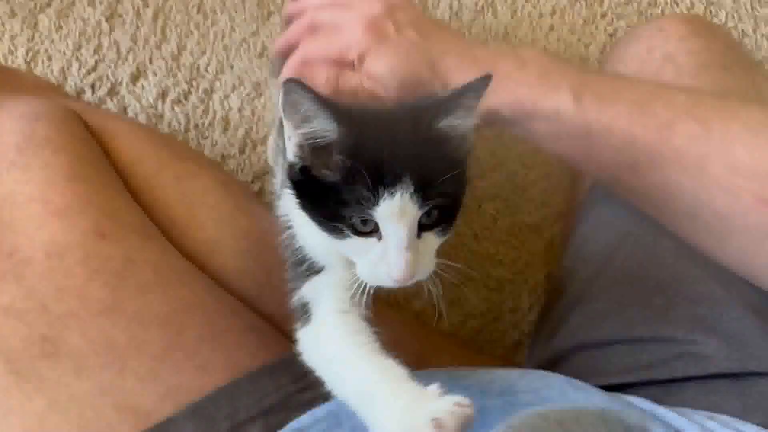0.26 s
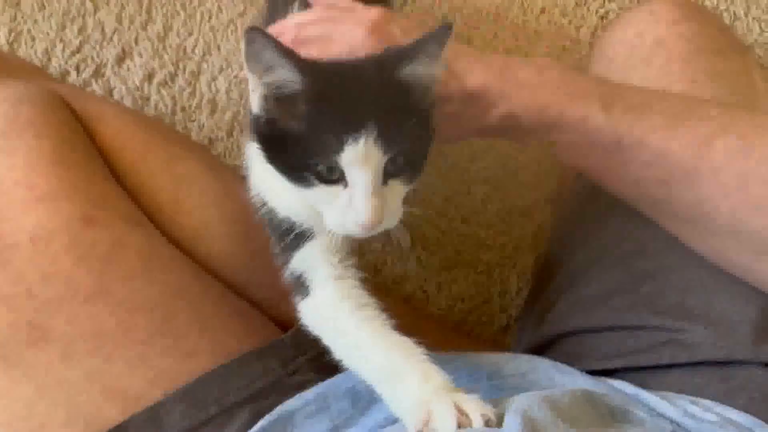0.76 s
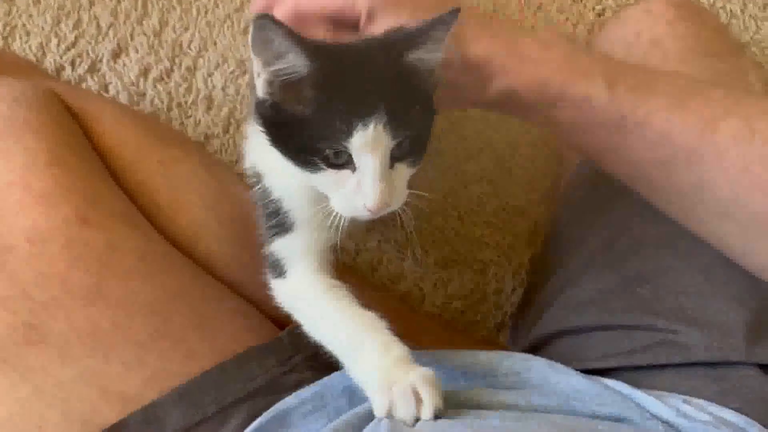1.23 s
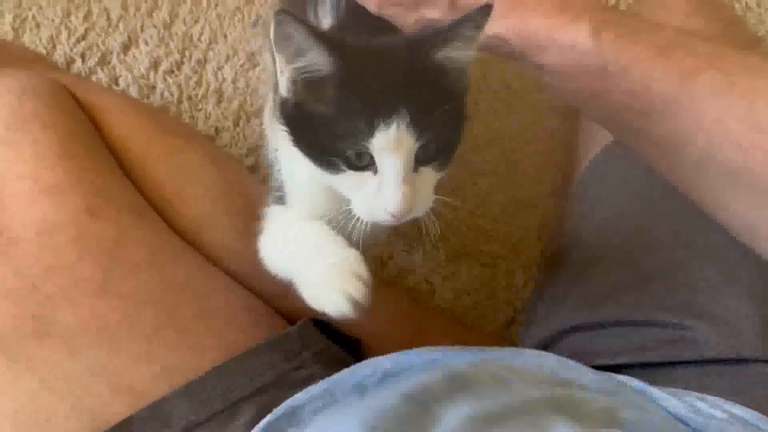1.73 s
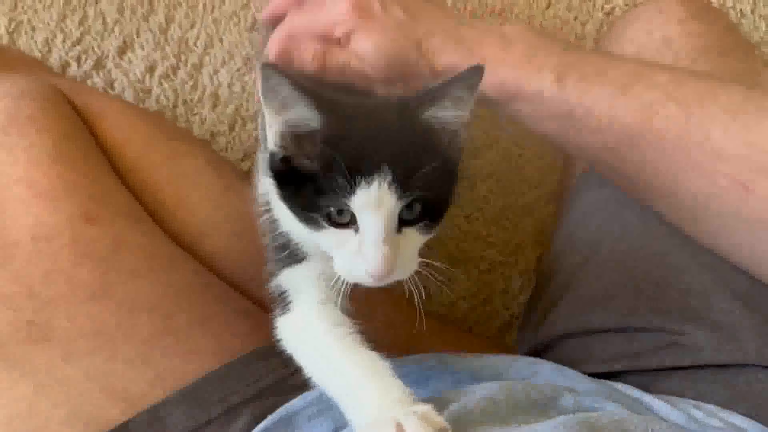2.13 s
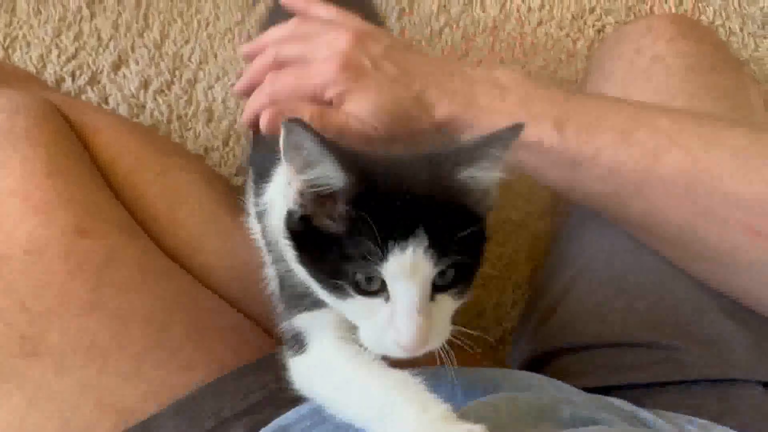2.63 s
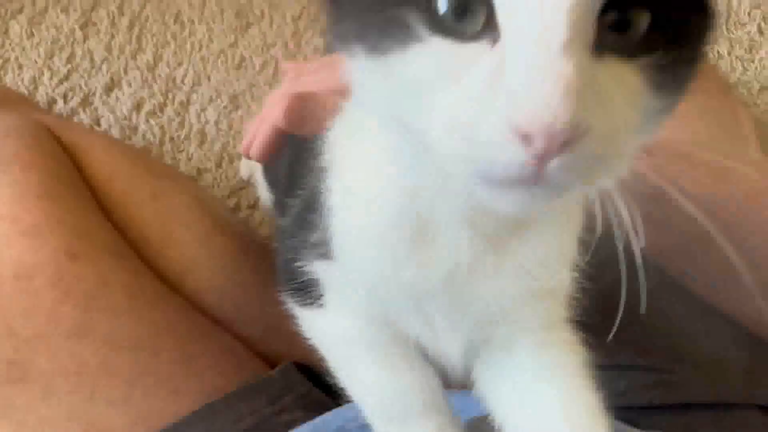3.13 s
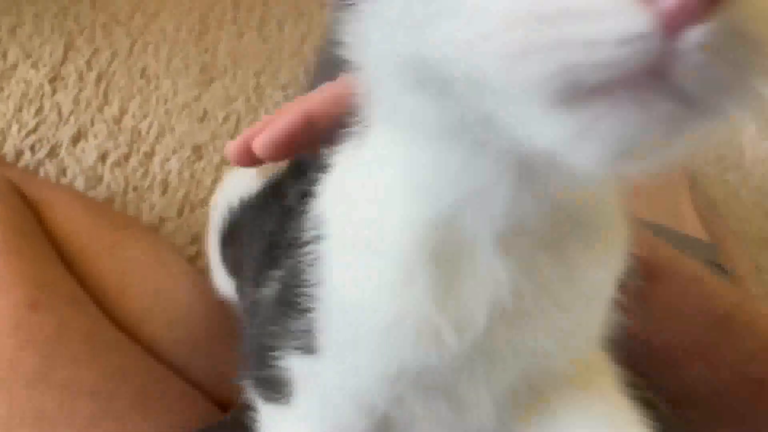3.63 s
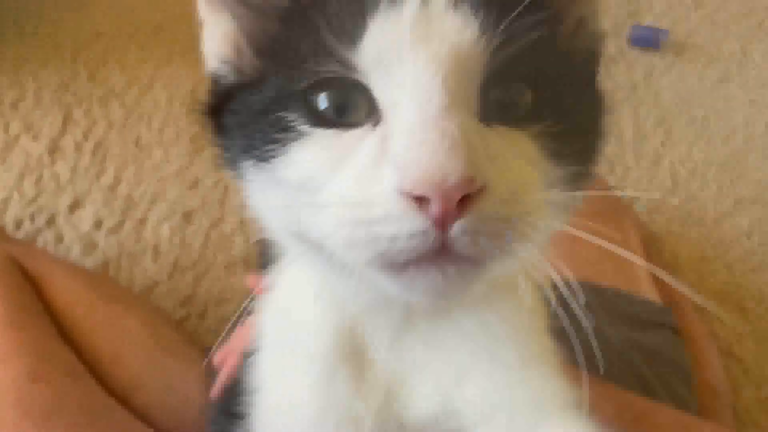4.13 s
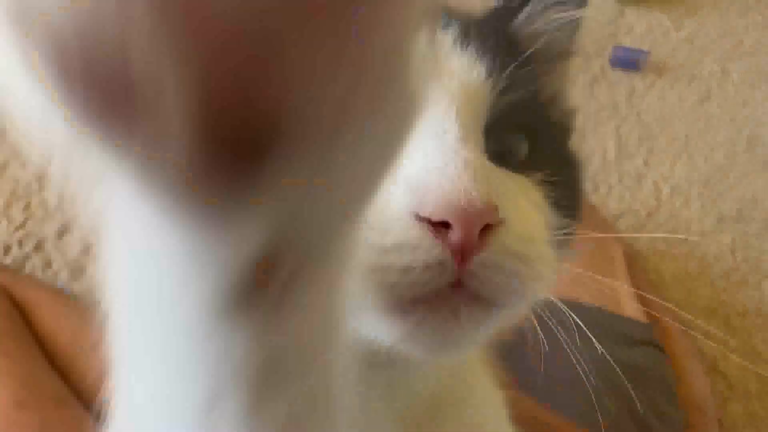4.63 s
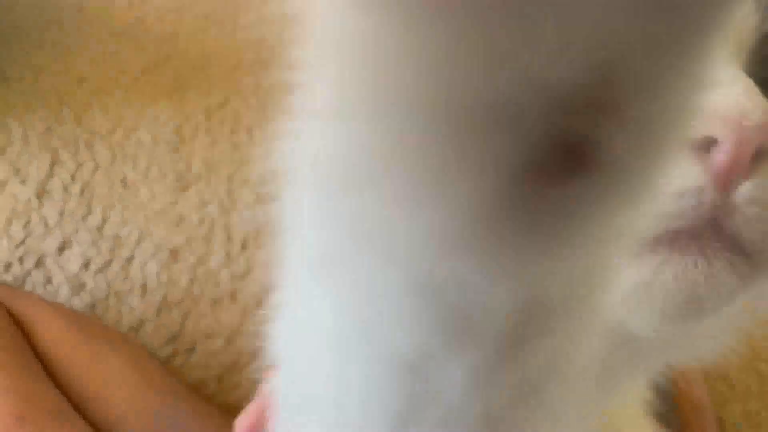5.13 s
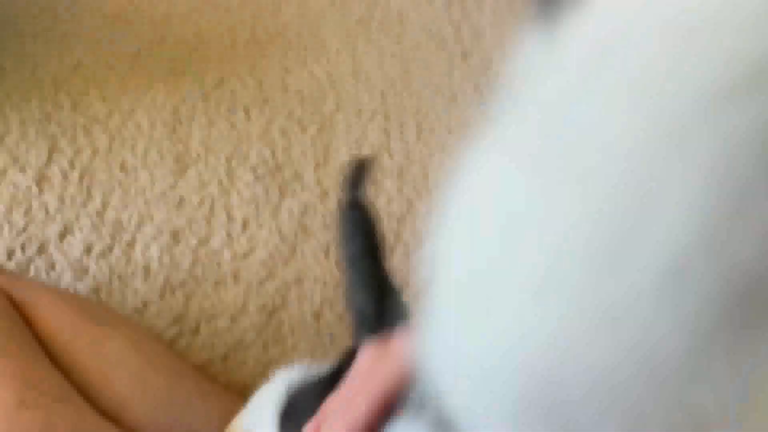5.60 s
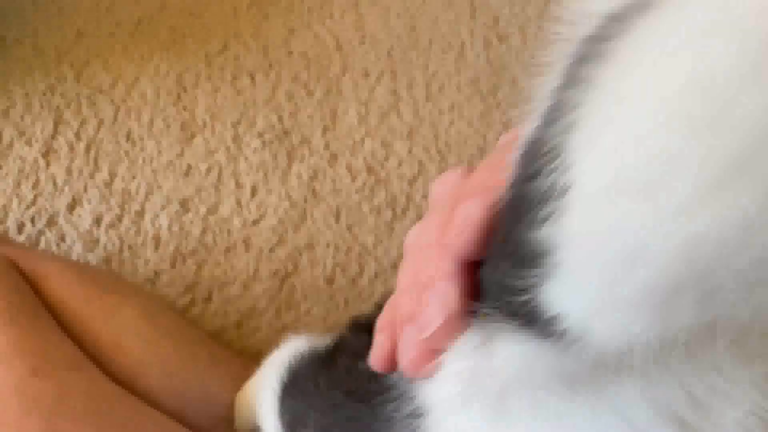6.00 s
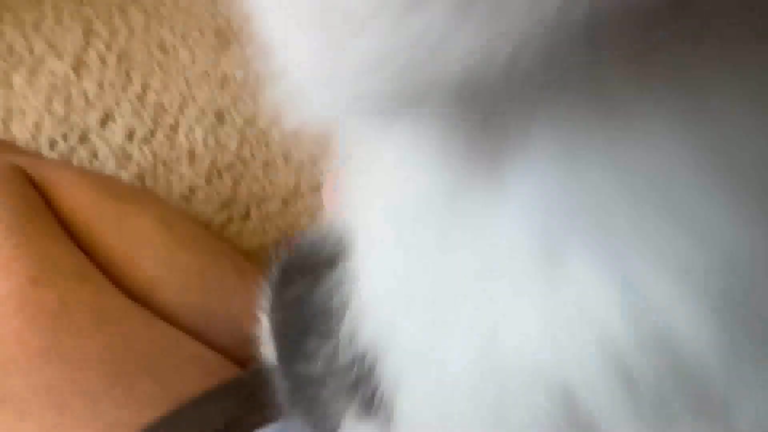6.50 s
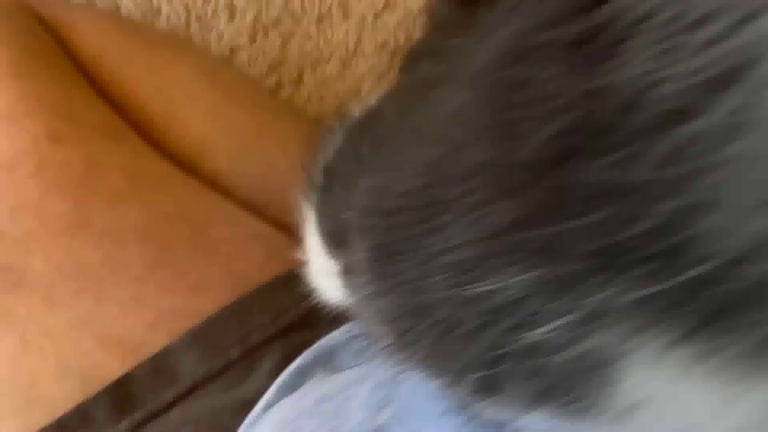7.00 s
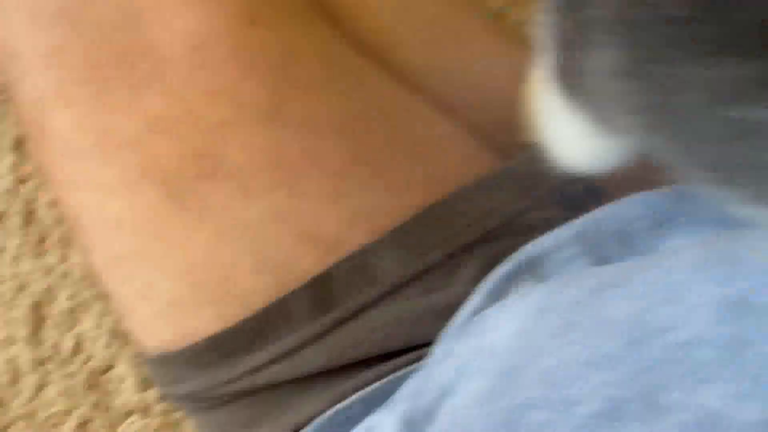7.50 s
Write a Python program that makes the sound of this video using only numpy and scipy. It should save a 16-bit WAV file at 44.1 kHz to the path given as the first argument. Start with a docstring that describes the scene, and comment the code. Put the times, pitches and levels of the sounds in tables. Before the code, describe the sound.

Close, dry indoor sound of a purring kitten being stroked. The purr alternates between outward and inward breaths, with paired soft puffs, barely covered by faint palm-on-fur hiss. It swells as the animal climbs up, then its face strikes the handheld microphone with heavy thuds, clicks and one bright snap. Afterwards fur brushes past in rustling sweeps with light knocks and ticks, while the purr carries on and drifts to the right.

```python
"""A fluttering purr is heard first, over room hush and low handling rumble: a kitten lies on a lap.
A hand strokes its back with soft hisses; it climbs up to the microphone, bumps it and rubs its fur along it.
Each purr beat is two puffs from the larynx, sounding through body, throat and nose; touches are damped
rings, and rubbing is grainy noise. The microphone lags in the bass, so puffs and bumps sweep downward."""
import sys
import numpy as np
from scipy import signal
from scipy.fft import rfft, irfft, next_fast_len
from scipy.io import wavfile

SR = 44100
rng = np.random.default_rng(int(sys.argv[2]) if len(sys.argv) > 2 else 0)


def unload_audio(sound):
    """Save the sound as a 16-bit wav file, at the path given as the first command line argument."""
    columns = np.transpose(np.atleast_2d(sound))
    # keep every value between -1 and 1, then stretch to whole-number steps
    steps = np.round(np.clip(columns, -1, 1) * 32767)
    wavfile.write(sys.argv[1], SR, steps.astype(np.int16))


N = 341775
TIME = np.arange(N) / SR
SIZE = next_fast_len(N + SR // 2)   # padded transform length
FREQS = np.maximum(np.arange(SIZE // 2 + 1) * SR / SIZE, 1)

# Spectrum of the quiet room. Each row: frequency in Hz, relative level in dB.
ROOM_SPECTRUM = [(20, -26), (45, -8), (70, 1), (220, -3), (400, -22.5), (800, -35.5), (1700, -27),
                 (3000, -32.5), (5500, -37.5), (7000, -36.5), (8700, -46.5), (15000, -39)]
ROOM_DB, ECHO_DB, ROOM_T60_S = -66.5, -14.5, .2
# Likeness of left and right noise. Each row: frequency in Hz, correlation from 0 to 1.
LIKENESS = [(60, 0.92), (300, 0.95), (700, 1), (1500, 0), (15000, 0.15)]

# The microphone shifts in the hand. Each row: start in seconds, end in seconds, level in dB.
JOSTLES = [(0, 4.7, -60), (1.53, 2.05, -60.5), (4.75, 5.35, -54.5), (5.5, 5.6, -61), (6.19, 6.42, -46.5),
           (6.499, 8.2, -61)]
JOSTLE_ATTACK_S, JOSTLE_RELEASE_S = 0.037, 0.016
# Spectrum of handling rumble. Each row: frequency in Hz, relative level in dB.
RUMBLE_SPECTRUM = [(20, -20), (45, -3), (80, 0.5), (160, -10), (300, -18), (700, -38.5), (2000, -62.5)]

# The hand slides down the back. Each row: middle in seconds, half length in seconds, level in dB.
STROKES = [(0.27, .13, -77.5), (0.928, 0.085, -76), (1.51, 0.1, -78), (2.147, 0.12, -76.5),
           (2.722, 0.096, -75.5)]
# Spectrum of a palm on fur. Each row: frequency in Hz, relative density in dB per Hz.
STROKE_SPECTRUM = [(300, -4), (1500, 4.5), (9000, -1), (15000, -1.5)]

# Fur slides along the microphone. Each row: start in seconds, end in seconds, level at the start in dB.
RUBS = [(4.77, 5.081, -66.5), (5.546, 5.716, -61.5), (6.575, 7.75, -61)]
RUB_ATTACK_S, RUB_RELEASE_S, RUB_SLOPE_DB_PER_S = 0.033, 0.062, -6
# Spectrum of rubbing fur. Each row: frequency in Hz, relative density in dB per Hz.
RUB_SPECTRUM = [(500, 0), (1000, 8.5), (1800, 5.5), (2600, 1.5), (3500, 4), (5500, 1.5), (9500, -4),
                (14000, -4)]
# Quick scuffs of paw and muzzle. Each row: middle in seconds, half length in seconds, level in dB,
# left over right in dB.
SCUFFS = [(1.729, 0.014, -78, 8), (4.308, 0.11, -74, 5.5), (4.761, 0.0019, -24, 1.5),
          (4.78, 0.017, -34.5, 2), (4.963, 0.014, -53.5, 5), (5.262, 0.026, -50.5, -2.5),
          (5.308, 0.014, -36.5, 5), (5.587, 0.011, -53.5, 1), (5.64, 0.0053, -45.5, -2),
          (5.959, 0.049, -60, -4), (6.2, 0.0301, -55.5, -3.5), (6.358, 0.043, -54.5, -1),
          (7.599, 0.025, -57, -5.5)]
# Spectrum of a scuff. Each row: frequency in Hz, relative density in dB per Hz.
SCUFF_SPECTRUM = [(150, 9.5), (650, 15.5), (1150, 6), (2000, 7.5), (2800, 1), (5000, 1.5), (15000, -4.5)]

# Paws and nose bump the microphone. Each row: start in seconds, peak in dB before the contact filter,
# pitch of the damped swing in Hz.
BUMPS = [(1.514, -46, 63.6), (1.802, -37.5, 78), (1.878, -36, 66), (1.995, -37, 73), (2.648, -40, 84),
         (4.73, -11.5, 97), (4.7611, 4, 129), (4.782, -4.5, 285), (4.793, -9, 157), (4.964, -9.5, 68.5),
         (5.236, -18, 218), (5.248, -20, 81), (5.288, -21.5, 117), (5.309, -16.5, 353), (6.315, -34, 171),
         (6.335, -23.5, 405), (6.395, -31.5, 109.6), (6.554, -38.5, 480), (6.577, -34, 100),
         (6.85, -34, 605), (7.597, -25.5, 605), (7.664, -34.5, 800), (7.744, -33.5, 908)]
# Claws and whiskers tick on the housing. Each row: start in seconds, peak in dB, left over right in dB,
# ring in Hz.
TICKS = [(4.7308, -49.5, 16.5, 4000), (4.7642, -24.5, 12, 3830), (5.237, -34.5, 6.5, 3460),
         (5.2863, -29, 9, 5280), (5.5256, -39.5, -1.5, 4900), (5.6484, -29, -8.5, 5850),
         (5.8891, -32, -8.5, 6100), (6.1695, -35, 4.5, 5020), (6.3367, -32.5, 9, 2580),
         (6.5553, -47, -5, 1940), (6.8511, -39, 15.5, 1980), (7.5975, -32.5, 10.5, 3980),
         (7.6153, -44.5, 13, 4070), (7.6672, -39.5, 12.5, 5100), (7.685, -40.5, 7, 3970)]
# One sharp snap: start in seconds, rise time in seconds, rings as (Hz, peak in dB).
SNAP_S, SNAP_RISE_S, SNAP_RINGS = 5.2486, .00013, [(9000, -8), (14300, -15.5)]

# Breaths of the purr, out and in by turns, starting outward. Each row: first beat in seconds,
# last beat in seconds, number of beats, effort in dB.
BREATHS = [(.008, .048, 2, 2), (.088, .653, 16, 1.5), (.692, 1.536, 22, -2), (1.574, 2.226, 18, -1.5),
           (2.265, 3.1435, 23, 1.5), (3.182, 3.704, 15, -0.5), (3.7465, 4.187, 12, 2.5),
           (4.226, 4.613, 11, -0.5), (4.653, 5.105, 12, 3.5), (5.146, 5.337, 6, 0), (5.378, 5.664, 8, 0.5),
           (5.705, 6.057, 10, -7.5), (6.098, 6.425, 9, 3), (6.464, 6.665, 6, 0), (6.706, 7.129, 11, 0.5),
           (7.170, 7.448, 8, 1.5), (7.490, 7.745, 7, -1.5)]
# Shape of a breath, as (out, in): gap between the two puffs, edge levels, and slope through the breath.
PUFF_GAP_S = (.0158, .0125)
ONSET_DB, SLOPE_DB_PER_S, END_DB = (-3, -6.5), (3.5, -1.5), (-4.5, -6)
ATTACK_S, RELEASE_S = 0.026, .03
# Second puff against the first in dB, as (out, in).
SECOND_HUM_DB, SECOND_CHEST_DB = (-5.5, -10.5), (-9.5, 1)
SECOND_THROAT_DB, SECOND_NOSE_DB = (-0.5, 3), (5.5, 18)
# Turbulence relative to each pulse.
HUM_ROUGH, CHEST_ROUGH, THROAT_ROUGH, NOSE_ROUGH = .15, .27, .15, .5
# Climb up to the microphone and past it. Each row: time in seconds, gain from nearness in dB.
NEARNESS = [(0, -1.5), (.8, -0.5), (1.1, 3), (1.6, -0.5), (2.6, -1.5), (3.3, 3.5), (3.76, 12.5), (3.95, 4),
            (4.9, 8.5), (5.6, 8), (6.3, 4.5), (7.75, 1.5)]
# Turn of the head. Each row: time in seconds, facing the microphone from 0 to 1, left over right in dB.
HEAD_POSE = [(0, 0, 0.5), (2.6, 0.5, 3), (2.78, 1, 0), (3.5, 0.86, 3.5), (5.1, .95, 4), (5.7, 0.8, 0.5),
             (6.35, .95, 2), (6.5, .3, 7.5), (7.2, 0.6, -10.5), (7.75, 1, -19.5)]
# The body drops out of the microphone's reach. Each row: middle in seconds, half length in seconds,
# change in dB.
BODY_HIDDEN = [(5.684, 0.43, -12), (7.75, 0.11, -21.5)]
# Spectrum of the deep body hum. Each row: frequency in Hz, relative level in dB.
HUM_SPECTRUM = [(25, -31.5), (50, 6.5), (82, 20), (120, 7), (180, -13.5), (300, -68.5)]
# Spectrum of the chest. Each row: frequency in Hz, relative level in dB.
CHEST_SPECTRUM = [(60, -28.5), (130, -1), (185, 2), (238, 4.5), (300, -1), (400, -13.5), (600, -64.5)]
# Spectrum of the throat, head turned away. Each row: frequency in Hz, relative level in dB.
THROAT_AVERTED_SPECTRUM = [(250, -11.5), (380, -11), (480, 3), (560, 5), (680, -0.5), (820, -18.5),
                           (1100, -26.5), (1600, -69.5)]
# Spectrum of the throat, facing the microphone. Each row: frequency in Hz, relative level in dB.
THROAT_FACING_SPECTRUM = [(250, -6), (400, -.5), (620, 1), (780, 0.5), (890, -6.5), (1020, -31.5),
                          (1600, -64.5)]
# Spectrum of the nose. Each row: frequency in Hz, relative level in dB.
NOSE_SPECTRUM = [(750, -23), (1100, -3), (1450, -1), (1850, -4.5), (2250, -22.5), (2900, -47)]
# Spectrum of air rasping in the nostrils. Each row: frequency in Hz, relative level in dB.
RASP_SPECTRUM = [(2000, -11.5), (3200, -12), (4800, -1.5), (6500, -18)]
# Levels with the head turned away, before nearness, and what facing the microphone adds.
HUM_DB, CHEST_DB, THROAT_DB, NOSE_DB = -64.5, -58.5, -74.5, -86.5
THROAT_FACING_DB, NOSE_FACING_DB = 11, 4
# Shares of the nearness gain and of the left-right level, relative to the throat.
HUM_FOLLOWS, CHEST_FOLLOWS, NOSE_FOLLOWS = 1, 0.86, 1.05
BODY_PAN_SHARE, NOSE_PAN_SHARE = 0.27, 2.1
# The flank presses close: the chest booms and the deep hum is damped.
FLANK_START_S, FLANK_END_S, FLANK_FADE_S, FLANK_CHEST_DB, FLANK_HUM_DB = 7.16, 7.46, 0.22, 9.5, -6.5

# Resonance of the microphone port and the notch above it. Each row: frequency in Hz, gain in dB.
PORT_RESPONSE = [(6000, -0.5), (7500, 3), (8700, 7.5), (10100, 0.5), (11000, -19), (11500, -18.5),
                 (12300, -4.5), (14800, -2.5)]
# Phase lead of the left port over the right. Each row: frequency in Hz, phase in radians.
PORT_PHASE = [(250, 0.2), (600, 0.53), (1500, 0.28), (9000, 0.97)]
# Sensitivity of the left port over the right. Each row: frequency in Hz, level in dB.
PORT_BALANCE = [(60, 0.9), (650, 0), (1000, 4), (7300, 3.5), (9000, 0.5)]
CUTOFF_HZ = 16300


def from_db(db):
    """A level in decibels is twenty times the logarithm of an amplitude ratio."""
    return 10 ** (np.asarray(db) / 20)


def rms_one(x):
    """Dividing by the root mean square gives unit power."""
    return x / np.sqrt(np.mean(x ** 2) + 1e-30)


def in_time(rows):
    """Linear interpolation gives each column of a curve at every sample."""
    seconds, *columns = np.transpose(rows)
    return [np.interp(TIME, seconds, column) for column in columns]


def over_hz(points):
    """Interpolation on a logarithmic frequency axis gives a table at every frequency."""
    hz, value = np.transpose(points)
    return np.interp(np.log(FREQS), np.log(hz), value)


def filtered(x, response):
    """A linear filter multiplies the spectrum by its frequency response."""
    return irfft(rfft(x, SIZE) * response, SIZE)[..., :N]


def coloured(x, points):
    """Spectral shaping sets the timbre, normalised to unit power."""
    return rms_one(filtered(x, from_db(over_hz(points))))


def panned(x, db):
    """An interaural level difference, split evenly between the sides, places a sound."""
    return x * from_db(np.array([[.5], [-.5]]) * db)


def stereo_noise():
    """Mid and side noise mixed by correlation: alike up to the low mids, nearly independent above."""
    mid, side = rng.standard_normal((2, N))
    alike = over_hz(LIKENESS)
    shared = filtered(mid, np.sqrt(1 + alike))
    opposed = filtered(side, np.sqrt(1 - alike))
    return shared + opposed * [[1], [-1]]


def add(out, s, sound):
    """Superposition: a short sound is added in place from a given second."""
    at = round(s * SR)
    out[..., at:at + sound.shape[-1]] += sound[..., :N - at]


def swell(middle, half_length):
    """A Gaussian envelope describes a contact that grows and fades smoothly."""
    return np.exp(-np.minimum(((TIME - middle) / half_length) ** 2, 30))


def held(start, end, attack_s, release_s):
    """An exponential rise up to the start, a steady hold, and an exponential decay after the end."""
    before = np.maximum(start - TIME, 0) / attack_s
    after = np.maximum(TIME - end, 0) / release_s
    return np.exp(-np.minimum(before + after, 30))


def wobble(step_s):
    """Random fluctuation: normal values a step apart, joined by straight lines."""
    return np.interp(TIME, np.arange(N) * step_s, rng.standard_normal(N))


def patchy(x, patchy_db, step_s):
    """As a contact shifts, half-octave bands, with broad end bands, fluctuate independently."""
    band = np.clip(np.floor(2 * np.log2(FREQS / 700)), 0, 8)
    return sum(filtered(x, band == k) * from_db(patchy_db * wobble(step_s)) for k in np.unique(band))


def hush():
    """Steady shaped noise represents the diffuse background of a quiet room."""
    return from_db(ROOM_DB) * coloured(stereo_noise(), ROOM_SPECTRUM)


def room(x):
    """Reverberation: convolution with decaying noise, different at each side, after a 4 ms gap."""
    t = TIME[:SR // 4]
    tail = rng.standard_normal((2, len(t))) * from_db(-60 * t / ROOM_T60_S) * (t > .004)
    tail /= np.sqrt(np.sum(tail ** 2) / 2)
    return signal.fftconvolve(x, tail, axes=1)[:, :N]


def rumble():
    """Motion of the microphone itself makes low-frequency noise for as long as it shifts."""
    motion = sum(from_db(db) * held(start, end, JOSTLE_ATTACK_S, JOSTLE_RELEASE_S)
                 for start, end, db in JOSTLES)
    return motion * coloured(stereo_noise(), RUMBLE_SPECTRUM)


def strokes(pan_db):
    """Sliding friction of a palm on soft fur makes a smooth hiss that follows the pressure."""
    pressure = sum(from_db(db) * swell(s, half) for s, half, db in STROKES)
    return panned(pressure, pan_db) * coloured(stereo_noise(), STROKE_SPECTRUM)


def fur(grain_db, grain_s, pan_db):
    """Stick-slip of hairs on the microphone: grainy hiss under easing rubs, fuller in quick scuffs."""
    grains = patchy(stereo_noise(), patchy_db=2.5, step_s=0.036) * from_db(grain_db * wobble(grain_s))
    rubbing = 0
    for start, end, db in RUBS:
        level_db = db + RUB_SLOPE_DB_PER_S * np.clip(TIME - start, 0, end - start)
        rubbing = rubbing + from_db(level_db) * held(start, end, RUB_ATTACK_S, RUB_RELEASE_S)
    scuffs = sum(panned(from_db(db) * swell(s, half), pan) for s, half, db, pan in SCUFFS)
    return panned(rubbing, pan_db) * coloured(grains, RUB_SPECTRUM) + scuffs * coloured(grains, SCUFF_SPECTRUM)


def ring(hz, q):
    """A damped oscillator: a sinusoid with exponential decay set by its quality factor, of height 1."""
    cycles = hz * TIME[:SR // 8]
    swing = np.sin(2 * np.pi * cycles) * np.exp(-np.pi * cycles / q)
    return swing / swing.max()


def bumps(q, low_cut_hz, soft_hz):
    """Impact on the housing: the softer the contact, the lower the heavily damped swing."""
    out = np.zeros(N)
    for s, db, hz in BUMPS:
        add(out, s, from_db(db) * ring(hz, q))
    contact_filter = signal.butter(2, [low_cut_hz, soft_hz], "band", fs=SR, output="sos")
    return signal.sosfilt(contact_filter, out)


def ticks(ring_s, scratch_s, scratch_share):
    """Impulse excitation: a hard contact and a tiny scratch set off a brief ring."""
    out, t = np.zeros((2, N)), TIME[:SR // 100]
    for s, db, pan_db, hz in TICKS:
        scratch = rng.standard_normal(len(t)) * np.exp(-t / scratch_s)
        contact = (t == 0) + scratch_share * scratch
        tick = np.convolve(contact, np.sin(2 * np.pi * hz * t) * np.exp(-t / ring_s))
        add(out, s, panned(from_db(db) * tick / np.abs(tick).max(), pan_db))
    return out


def snap():
    """Resonance of the port itself, flicked by a claw: two very brief high rings."""
    out, t = np.zeros(N), TIME[:SR // 200]
    rings = sum(from_db(db) * np.sin(2 * np.pi * hz * t) for hz, db in SNAP_RINGS)
    envelope = (t / SNAP_RISE_S) * np.exp(1 - t / SNAP_RISE_S)
    add(out, SNAP_S, rings * envelope)
    return out


def beats(jitter_s):
    """Laryngeal rhythm: two puff times per beat, air direction, and strength shaped by the breath."""
    rows = []
    for k, (first, last, count, effort_db) in enumerate(BREATHS):
        inward = k % 2
        for s in np.linspace(first, last, round(count)):
            onset = ONSET_DB[inward] * np.exp((first - s) / ATTACK_S)
            slope = SLOPE_DB_PER_S[inward] * (s - (first + last) / 2)
            ending = END_DB[inward] * np.exp((s - last) / RELEASE_S)
            rows.append((s, s + PUFF_GAP_S[inward], inward, effort_db + onset + slope + ending))
    rows = np.array(rows)
    times = rows[:, :2] + jitter_s * rng.standard_normal((len(rows), 2))
    return times, rows[:, 2].astype(int), from_db(rows[:, -1])


def puffs(rhythm, second_db, uneven_db, rough, hiss_s):
    """Pulsed airflow: paired pulses of uneven strength, each trailed by decaying turbulence."""
    times, inward, strength = rhythm
    second = from_db(second_db)[inward]
    # the pair shares the energy of its beat
    sizes = np.stack([np.ones_like(second), second], axis=1) * (strength / np.hypot(1, second))[:, None]
    train = np.zeros(SIZE)
    train[np.abs(times * SR).astype(int)] = sizes * from_db(uneven_db * rng.standard_normal(times.shape))
    train = train[:N]
    # hiss_s is the decay time of the turbulent energy
    fade = np.exp(-1 / (hiss_s * SR))
    wisp = np.sqrt(signal.lfilter([1 - fade], [1, -fade], train ** 2 + 1e-18))
    return train + rough * wisp * rng.standard_normal(N)


def purr():
    """Source and filter: shared puff times excite body, throat and nose; facing the microphone lifts the throat
    most and the nose less."""
    near_db, = in_time(NEARNESS)
    facing, pan_db = in_time(HEAD_POSE)
    body_db = sum(db * swell(s, half) for s, half, db in BODY_HIDDEN)
    flank = held(FLANK_START_S, FLANK_END_S, FLANK_FADE_S, FLANK_FADE_S)
    hum_db = HUM_DB + HUM_FOLLOWS * near_db + body_db + FLANK_HUM_DB * flank
    chest_db = CHEST_DB + CHEST_FOLLOWS * near_db + body_db + FLANK_CHEST_DB * flank
    throat_db = THROAT_DB + near_db + THROAT_FACING_DB * facing
    nose_db = NOSE_DB + NOSE_FOLLOWS * near_db + NOSE_FACING_DB * facing

    rhythm = beats(jitter_s=.0003)
    hum_puffs = puffs(rhythm, SECOND_HUM_DB, uneven_db=3.5, rough=HUM_ROUGH, hiss_s=.008)
    chest_puffs = puffs(rhythm, SECOND_CHEST_DB, uneven_db=0.96, rough=CHEST_ROUGH, hiss_s=0.0071)
    throat_puffs = puffs(rhythm, SECOND_THROAT_DB, uneven_db=.9, rough=THROAT_ROUGH, hiss_s=0.0019)
    nose_puffs = puffs(rhythm, SECOND_NOSE_DB, uneven_db=0.1, rough=NOSE_ROUGH, hiss_s=.0013)
    rasp_puffs = puffs(rhythm, SECOND_NOSE_DB, uneven_db=6, rough=9.2, hiss_s=0.014)

    hum = from_db(hum_db) * coloured(hum_puffs, HUM_SPECTRUM)
    chest = from_db(chest_db) * coloured(chest_puffs, CHEST_SPECTRUM)
    averted = (1 - facing) * coloured(throat_puffs, THROAT_AVERTED_SPECTRUM)
    frontal = facing * coloured(throat_puffs, THROAT_FACING_SPECTRUM)
    throat = from_db(throat_db) * (averted + frontal)
    nose = coloured(nose_puffs, NOSE_SPECTRUM)
    rasp = from_db(-14) * facing * coloured(rasp_puffs, RASP_SPECTRUM)
    nostrils = from_db(nose_db) * (nose + rasp)

    body = panned(hum + chest, BODY_PAN_SHARE * pan_db)
    return body + panned(throat, pan_db) + panned(nostrils, NOSE_PAN_SHARE * pan_db)


def scene():
    """Superposition of purr and its reflections, touches, rubbing, rumble and room hush."""
    kitten = purr()
    knocks = bumps(q=1.0, low_cut_hz=66, soft_hz=800)
    touches = knocks + ticks(ring_s=.00009, scratch_s=0.00096, scratch_share=0.23) + snap()
    rubbing = strokes(pan_db=2.0) + fur(grain_db=3.0, grain_s=.0012, pan_db=-4.5)
    return kitten + from_db(ECHO_DB) * room(kitten) + touches + rubbing + rumble() + hush()


def record(dry):
    """Dispersion delays the bass most, the two ports colour and offset the sides, and the top is cut."""
    # well above the knee the delay is about lag_cycles / frequency
    lag_cycles, knee_hz = 1.2, 15
    lag = np.exp(-2j * np.pi * lag_cycles * np.log(1 + FREQS / knee_hz))
    phase = np.exp(1j * over_hz(PORT_PHASE) * np.array([[.5], [-.5]]))
    mismatch = panned(phase, over_hz(PORT_BALANCE))
    heard = filtered(dry, lag * mismatch * from_db(over_hz(PORT_RESPONSE)))
    top_cut = signal.ellip(10, .2, 80, CUTOFF_HZ, fs=SR, output="sos")
    return signal.sosfilt(top_cut, heard)


dry = scene()
out = record(dry)
unload_audio(out)
```